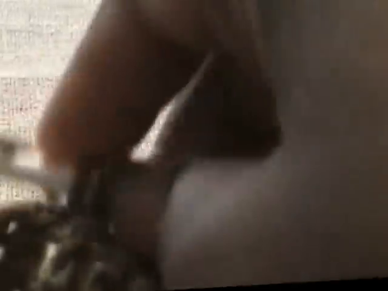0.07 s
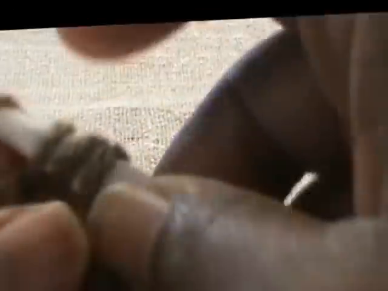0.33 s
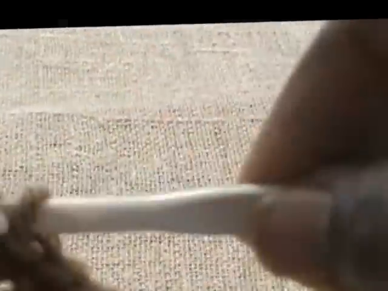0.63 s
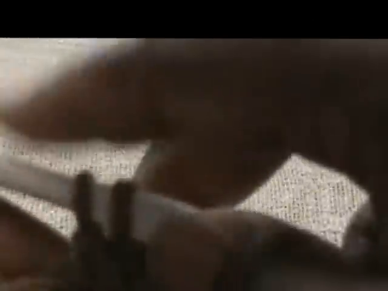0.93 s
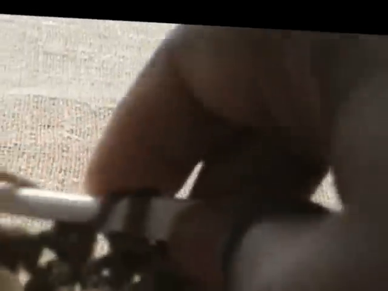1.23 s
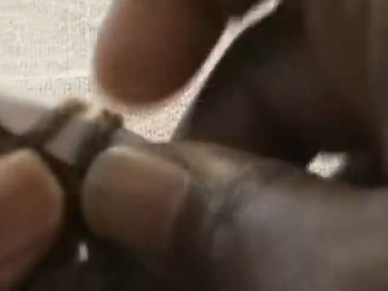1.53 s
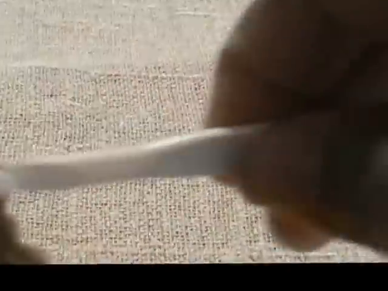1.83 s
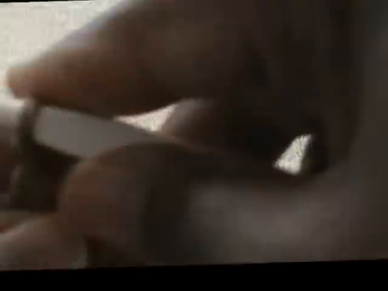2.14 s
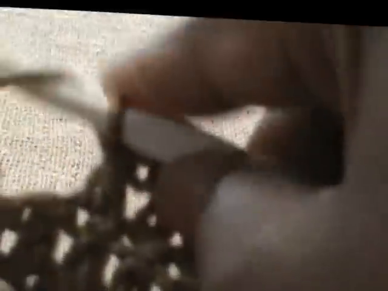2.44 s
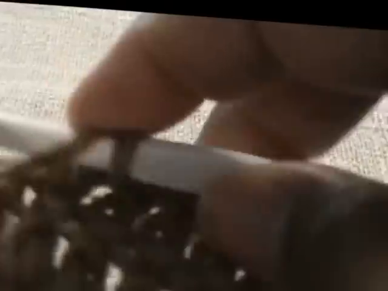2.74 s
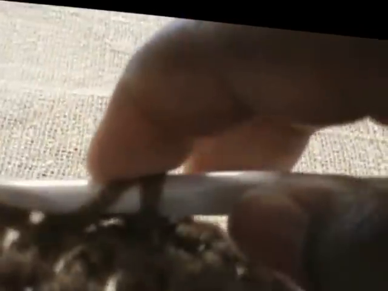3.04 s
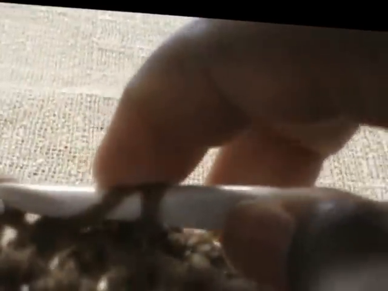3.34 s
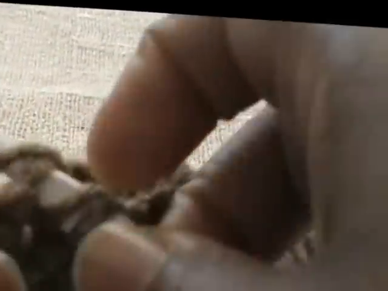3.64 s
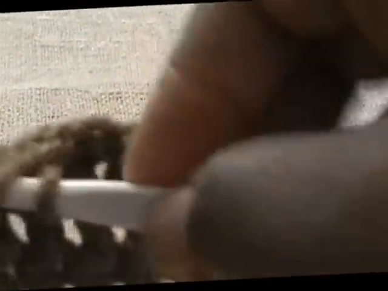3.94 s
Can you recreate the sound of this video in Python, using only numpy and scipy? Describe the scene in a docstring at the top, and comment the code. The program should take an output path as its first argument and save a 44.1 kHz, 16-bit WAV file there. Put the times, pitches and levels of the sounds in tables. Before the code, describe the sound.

Yarn brushes softly over a crochet hook and fingers close to the microphone, in uneven strokes with a few tiny snaps, pausing briefly near the end. The quiet room holds a throbbing hum, hiss and faint clock-like ticks.

```python
"""Close, soft strokes of yarn brush over a crochet hook and fingers, with a few tiny snaps.
Each stroke is a swell of fibre friction, a bright brush over a lower rub; a snap is a strand slipping
off the hook. Behind the hands, two motors beat against each other in a throbbing hum, and the quiet
room holds a low rumble, steady hiss, a thin electronic whine and a faint tick once a second,
like a far clock."""
import sys
import numpy as np
from scipy import signal
from scipy.fft import rfft, irfft
from scipy.io import wavfile

SR = 44100
rng = np.random.default_rng(int(sys.argv[2]) if len(sys.argv) > 2 else 0)


def master(y):
    """Save y as 16-bit WAV."""
    cut = np.clip(np.atleast_2d(y).T, -1, 1)
    pcm = np.round(cut * 32767)  # scale
    wavfile.write(sys.argv[1], SR, pcm.astype(np.int16))


N = 176400

# yarn strokes: peak_s, rise_s, fall_s, level_db, brightness_db_per_octave, rub_relative_db
YARN_STROKES = [ (.02, 0.07, 0.053, -36.5, 1, -5.5), (.115, .02, 0.025, -45.5, 2, -16),
                (.218, 0.043, 0.07, -36, 4, -14), (.305, 0.07, 0.074, -43, -2, -0.5),
                (.38, 0.022, .03, -45, -2, -2), (.463, 0.028, 0.022, -38.5, 8, -12),
                (.53, 0.081, 0.066, -42.5, -2, -8), (.62, 0.057, .03, -40.5, 11, -13),
                (.70, 0.062, 0.13, -43, 6, -10.5), (.87, 0.035, 0.069, -46.5, 6, -7),
                (1.03, 0.11, 0.095, -47.5, 2, -8), (1.175, 0.083, 0.08, -41.5, -1, -6),
                (1.31, 0.056, 0.084, -47.5, 3, -1), (1.41, .04, 0.053, -44.5, 6, -8.5),
                (1.515, 0.11, 0.1, -42, 6, -8.5), (1.63, 0.061, 0.066, -44, 3, -8),
                (1.73, 0.052, 0.046, -38.5, 4, -7.5), (1.773, 0.029, 0.016, -40, 10, -15),
                (1.802, 0.026, 0.016, -34.5, 18, -16), (1.866, 0.039, 0.023, -33.5, 6, -14.5),
                (1.9, .02, 0.037, -40, 2, -11), (2.04, 0.064, 0.065, -43.5, 6, -9.5),
                (2.164, 0.025, 0.024, -43, 1, -7), (2.235, 0.037, .03, -55.5, -1, 3),
                (2.285, 0.052, 0.053, -39, -3, -6), (2.335, 0.055, 0.074, -41, -2, -4),
                (2.468, 0.018, 0.011, -45.5, 4, -6), (2.575, 0.017, 0.02, -39, 9, -12),
                (2.63, 0.042, .04, -50, 5, -7), (2.785, 0.04, 0.048, -38, 0, -13.5),
                (2.86, 0.043, 0.053, -44, 4, -9), (3.5, 0.035, 0.037, -43.5, -3, -8),
                (3.555, 0.031, 0.028, -43, 3, -9), (3.639, 0.048, 0.052, -40.5, 4, -9.5),
                (3.696, 0.029, 0.036, -39, -7, -8), (3.727, 0.021, 0.022, -37.5, 1, -8),
                (3.845, 0.046, 0.035, -40.5, 4, -9.5), (3.892, 0.026, 0.04, -39.5, 11, -11)]
# airy top of fibres brushing: frequency_hz, gain_db
BRUSH_EQ = [(300, -34), (3000, -21), (6400, -10), (7600, -3.5), (8600, -3.5), (9900, 0), (11000, -1),
            (12300, -2.5), (14000, -9), (16000, -13)]
# lower body of yarn pressed on hook and skin: frequency_hz, gain_db
RUB_EQ = [(100, -17), (500, -5), (1000, -4.5), (1800, -3.5), (2400, -1.5), (3000, 1), (3800, 1.5),
          (4800, -1.5), (6200, -2.5), (9000, -26), (16000, -33)]
# strands snapping off the hook: start_s, peak_db, decay_s
STRAND_SNAPS = [(1.805, -21, .003), (1.8635, -30, 0.0013), (2.0591, -22, .0006), (2.1008, -28, 0.00046),
                (2.2785, -30, .0006), (3.551, -28, .0005), (3.893, -28, .001)]
# crisp tone of a snap: frequency_hz, gain_db
SNAP_EQ = [(300, -25), (3000, -13), (7500, -5), (10500, 6), (13000, -5), (16000, -7)]
# partials of the motor and mains hum: pitch_hz
HUM_PITCHES = [110.27, 116.12, 119.95, 165.4, 171.25, 232.24, 239.94, 348.33]
# balance of those partials, in the same order: level_db
HUM_LEVELS = [-36, -35.5, -60.5, -52, -44, -63, -58.5, -59]
# fader ride on the lowest motor tone: time_s, level_db
DRONE_RIDE = [(0.04, -31.5), (0.25, -36), (1.47, -29), (1.52, -34), (1.79, -29), (2.06, -37), (2.3, -31),
              (2.61, -31), (2.67, -36), (2.77, -31), (3.17, -33.5), (3.66, -31), (3.92, -36.5), (3.96, -31)]
# low room tone: frequency_hz, gain_db
RUMBLE_EQ = [(8, -28), (18, -10), (45, -4.5), (68, -13.5), (87, 3.5), (105, -1), (125, -2), (143, -3),
             (165, 2.5), (205, -6), (245, -8.5), (280, -8), (320, -15), (420, -18), (600, -26.5),
             (1200, -36), (4000, -47.5)]
# stereo width of the rumble: frequency_hz, side_gain_db
RUMBLE_WIDTH = [(20, -28), (60, -26), (110, -24.5), (200, -16.5), (380, -1.5), (700, 6.5), (2000, 0)]
# contour of the rumble's swells, centred and scaled down in rumble(): time_s, contour_db
RUMBLE_RIDE = [(0.0, -23.5), (0.05, -36), (0.08, -36), (0.29, -31.5), (0.34, -34), (1.19, -37.5),
               (1.21, -34), (1.34, -39.5), (1.4, -33.5), (1.68, -36), (1.7, -34.5), (2.17, -36.5),
               (3.62, -34.5), (3.69, -25), (3.72, -36), (3.9, -36), (3.95, -29.5), (4.0, -33)]
# far ticks: start_s, level_db
CLOCK_TICKS = [(.412, -46), (1.41, -45.5), (2.408, -46), (3.41, -45.5)]
# ringing peaks of a tick: frequency_hz, gain_db
TICK_EQ = [(300, -29), (900, 4.5), (1450, -9), (1850, 8.5), (2450, -2.5), (3100, 2.5), (3550, -10),
           (4150, 1.5), (5000, -13), (15000, -31)]
# broad bed of hiss: frequency_hz, gain_db
HISS_EQ = [(100, 0), (900, 8), (1500, 4), (2500, 2.5), (4400, 1), (7500, -0.5), (11000, 1), (15500, -1.5)]
# stereo width of the hiss: frequency_hz, side_gain_db
HISS_WIDTH = [(700, -1), (1300, 1.5), (2400, -0.5), (4400, -3.5), (8000, -9), (15000, -10)]

BRUSH_SIDE_DB, RUB_SIDE_DB, TICK_SIDE_DB = -11.5, -16, -8  # stereo width: side against mid


def yarn(catch_db=1.34, catch_hz=111, swell_shape=1.57):
    """Yarn drags over hook and skin: brush and rub swell together, roughened as it catches and lets go."""
    out = np.zeros((2, N))
    t = np.arange(-SR // 4, SR // 4) / SR
    for peak_s, rise_s, fall_s, level_db, brightness_db, rub_db in YARN_STROKES:
        slope_s = np.where(t < 0, rise_s, fall_s)
        swell = np.exp(-abs(t / slope_s) ** swell_shape)  # shape 1 is pointed, 2 a bell
        brush = [unit_rms(eq(friction(len(t)), BRUSH_EQ, brightness_db)) for _ in range(2)]
        rub = [unit_rms(eq(friction(len(t)), RUB_EQ)) for _ in range(2)]
        stroke = stereo(*brush, BRUSH_SIDE_DB) + amp(rub_db) * stereo(*rub, RUB_SIDE_DB)
        catching_db = catch_db * wander(len(t), catch_hz)
        add(out, peak_s + t[0], stroke * swell * amp(level_db + catching_db))
    return out


def friction(size, slips_per_s=5000, spread_db=1.5, smooth_gain=0.81):
    """A grain of tiny, uneven fibre slips over smooth sliding noise."""
    polarity = rng.choice([-1, 1], size)
    strength = amp(spread_db * np.minimum(rng.exponential(1, size), 5))
    slipping = rng.random(size) < slips_per_s / SR
    return unit_rms(polarity * strength * slipping) + smooth_gain * rng.standard_normal(size)


def snaps():
    """A strand slips off the hook in a very short, bright burst."""
    out = np.zeros((2, N))
    t = np.arange(-SR // 100, SR // 50) / SR
    for start_s, peak_db, decay_s in STRAND_SNAPS:
        envelope = (t >= 0) * np.exp(-abs(t) / decay_s)
        mid, side = [eq(rng.standard_normal(len(t)) * envelope, SNAP_EQ) for _ in range(2)]
        snap = stereo(mid, side, BRUSH_SIDE_DB) / abs(mid).max()
        add(out, start_s + t[0], amp(peak_db) * snap)
    return out


def motor_hum(first_throb_s=0.077, drone_hz=55.14, waver_db=1.3, waver_hz=3.4):
    """Two motors beat about six times a second, their partials wavering over a deep drone."""
    t = np.arange(N) / SR - first_throb_s
    phase = rng.random()  # shared, so the partials line up on the first throb
    partials = np.zeros(N)
    for pitch_hz, level_db in zip(HUM_PITCHES, HUM_LEVELS):
        gain = amp(level_db + waver_db * wander(N, waver_hz))
        partials += gain * np.cos(2 * np.pi * (pitch_hz * t + phase))
    drone = amp(ride(DRONE_RIDE)) * np.cos(2 * np.pi * (drone_hz * t + rng.random()))
    return np.sqrt(2) * (partials + drone)


def rumble(level_db=-34, swell_depth=0.55):
    """Low room noise that swells and sinks a little."""
    contour_db = ride(RUMBLE_RIDE)
    swell = amp(swell_depth * (contour_db - contour_db.mean()))
    return swell * noise_bed(RUMBLE_EQ, RUMBLE_WIDTH, level_db)


def clock(rise_s=0.0084, fade_from_s=0.034, t60_s=0.33):
    """A far tick, heard almost wholly as its ring in the room."""
    out = np.zeros((2, N))
    t = np.arange(SR // 2) / SR
    attack = np.minimum(t / rise_s, 1)
    tail = amp(-60 * np.maximum(t - fade_from_s, 0) / t60_s)
    for start_s, level_db in CLOCK_TICKS:
        ring = stereo(*noise_pair(len(t), TICK_EQ), TICK_SIDE_DB)
        add(out, start_s, amp(level_db) * attack * tail * ring)
    return out


def hiss(level_db=-45.5):
    """A steady noise floor, wide in the mids and narrower on top."""
    return noise_bed(HISS_EQ, HISS_WIDTH, level_db)


def whine(pitch_hz=15734, level_db=-64.5, flicker_db=3, flicker_hz=12):
    """A thin, very high electronic tone whose level flickers."""
    gain = amp(level_db + flicker_db * wander(N, flicker_hz))
    return np.sqrt(2) * gain * np.sin(2 * np.pi * pitch_hz * np.arange(N) / SR)


def noise_bed(tone, width, level_db):
    """Steady stereo noise whose width depends on frequency."""
    mid, side = noise_pair(N, tone)
    return amp(level_db) * stereo(mid, eq(side, width))


def noise_pair(size, tone):
    """Two independent noises of one colour at rms 1, for mid and side."""
    return [unit_rms(eq(rng.standard_normal(size), tone)) for _ in range(2)]


def eq(x, points, tilt_db=0, pivot_hz=10300, top_hz=12900):
    """An EQ curve plus a per-octave tilt, running from an octave below the pivot up to top_hz."""
    hz = np.fft.rfftfreq(len(x), 1 / SR) + 1
    point_hz, point_db = np.transpose(points)
    curve_db = np.interp(np.log(hz), np.log(point_hz), point_db)
    octaves = np.maximum(np.log2(np.minimum(hz, top_hz) / pivot_hz), -1)
    return irfft(rfft(x) * amp(curve_db + tilt_db * octaves), len(x))


def wander(size, rate_hz):
    """Random modulation at rms 1, mostly slower than rate_hz."""
    hz = np.fft.rfftfreq(size, 1 / SR)
    lowpass = (hz > 0) / (1 + (hz / rate_hz) ** 2)
    return unit_rms(irfft(rfft(rng.standard_normal(size)) * lowpass, size))


def ride(points):
    """A fader move: straight lines between timed points."""
    return np.interp(np.arange(N) / SR, *np.transpose(points))


def amp(db):
    """Decibels to gain."""
    return 10 ** (np.asarray(db) / 20)


def unit_rms(x):
    """Scales to rms 1."""
    return x / np.sqrt(np.mean(x ** 2) + 1e-20)


def stereo(mid, side, side_db=0):
    """Left and right from mid and side."""
    side = amp(side_db) * side
    return np.array([mid + side, mid - side])


def add(mix, start_s, sound):
    """Drops a sound into the mix, trimming any overhang."""
    at = round(start_s * SR)
    sound = sound[:, max(-at, 0):]
    part = mix[:, max(at, 0):][:, :sound.shape[1]]
    part += sound[:, :part.shape[1]]


def scene(lean_right_db=0.1):
    """Hands up close, the room behind."""
    pan = amp([[-lean_right_db / 2], [lean_right_db / 2]])
    hands = (yarn() + snaps()) * pan
    return hands + clock() + motor_hum() + whine() + rumble() + hiss()


def record(dry, cutoff_hz=15900):
    """A steep high cut on the whole mix, just above the whine."""
    high_cut = signal.firwin(1023, cutoff_hz, window=("kaiser", 9), fs=SR)
    return signal.oaconvolve(dry, high_cut[None], "same")


dry = scene()
out = record(dry)
master(out)
```